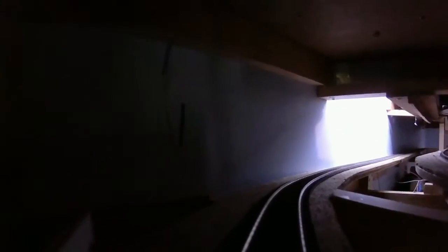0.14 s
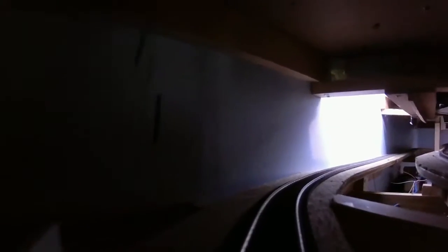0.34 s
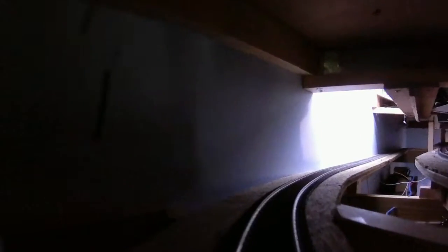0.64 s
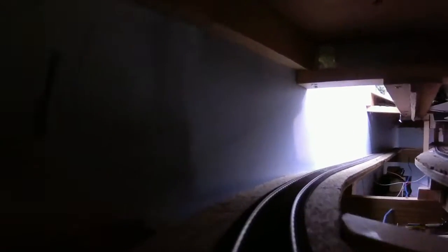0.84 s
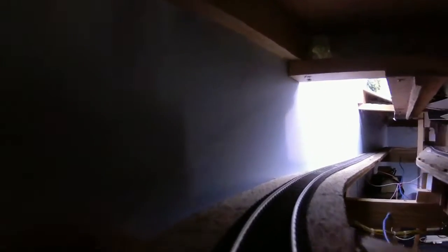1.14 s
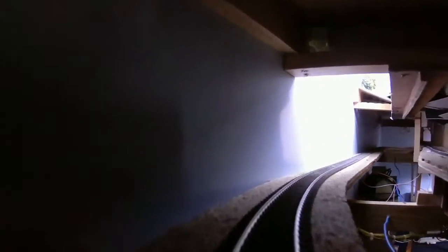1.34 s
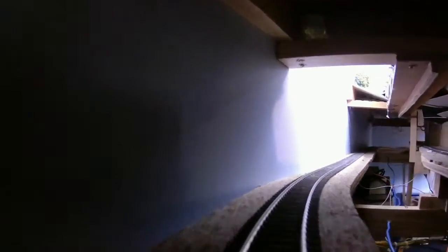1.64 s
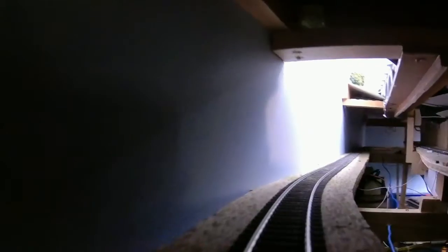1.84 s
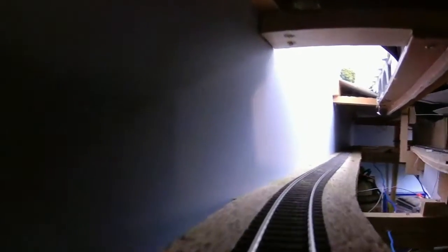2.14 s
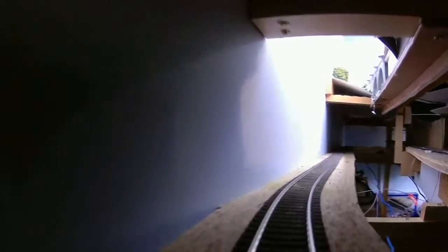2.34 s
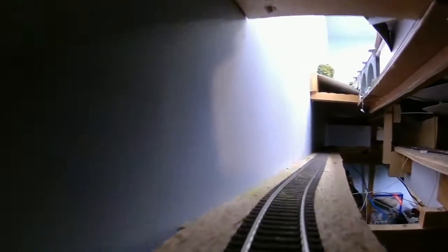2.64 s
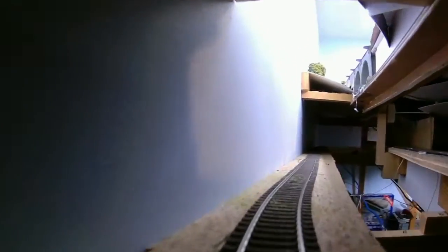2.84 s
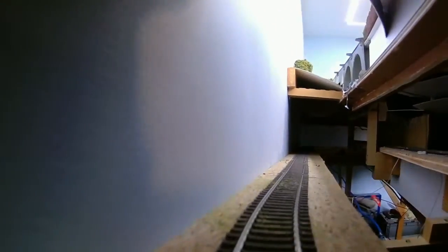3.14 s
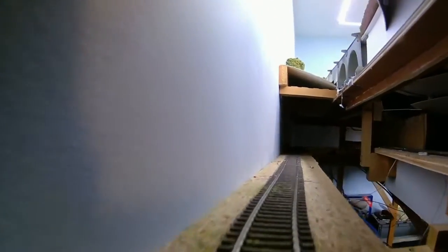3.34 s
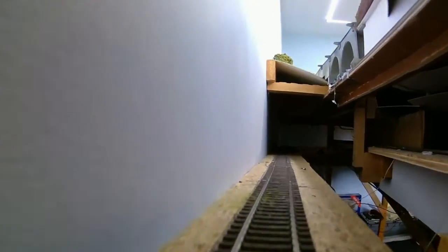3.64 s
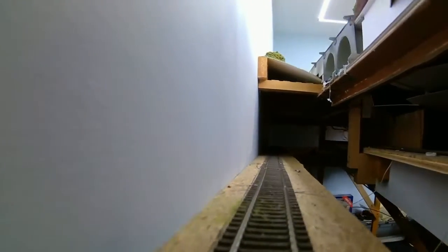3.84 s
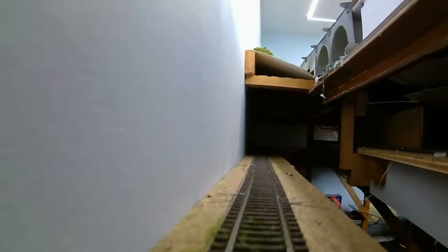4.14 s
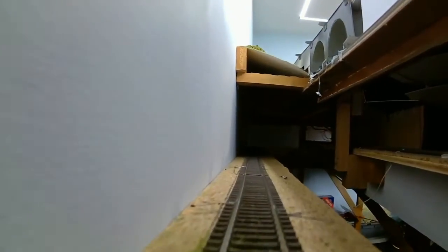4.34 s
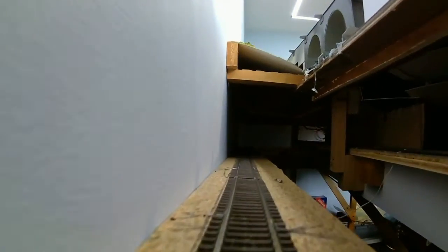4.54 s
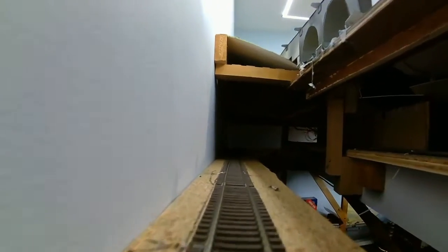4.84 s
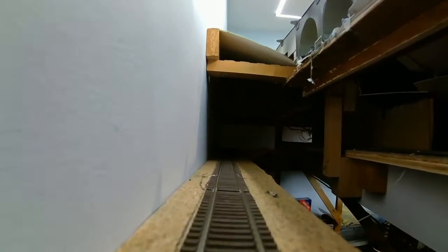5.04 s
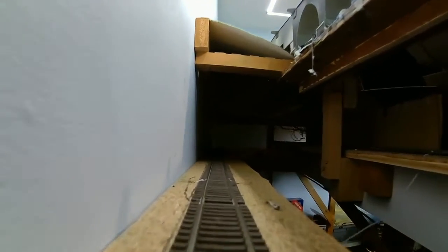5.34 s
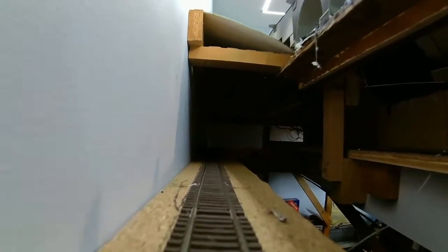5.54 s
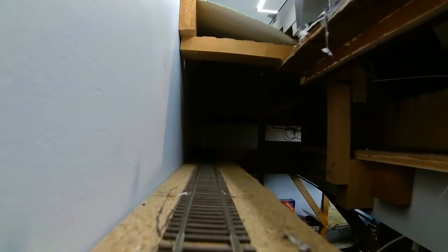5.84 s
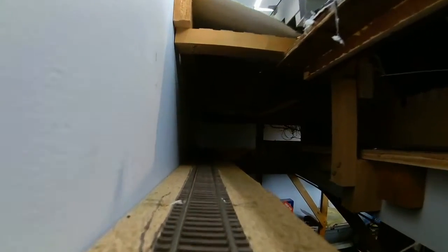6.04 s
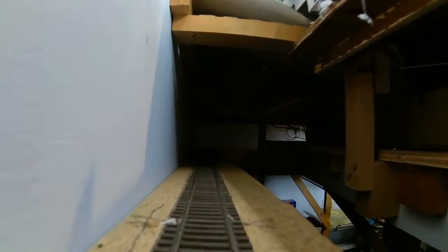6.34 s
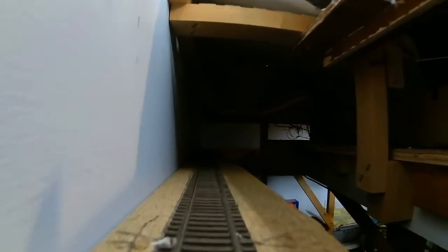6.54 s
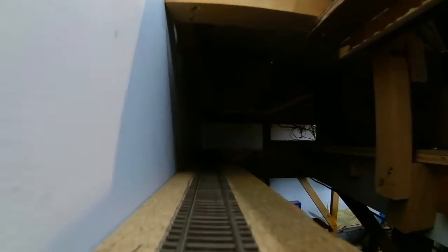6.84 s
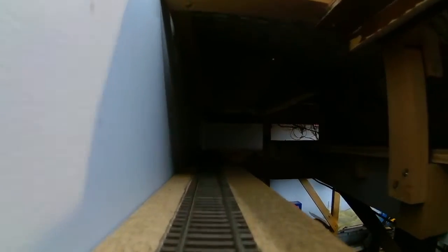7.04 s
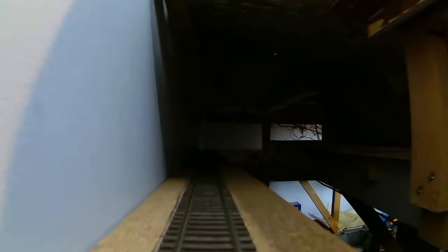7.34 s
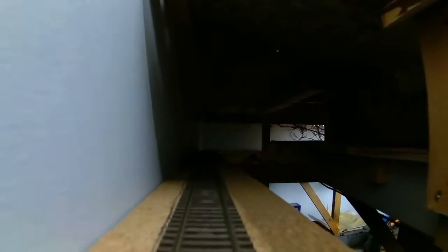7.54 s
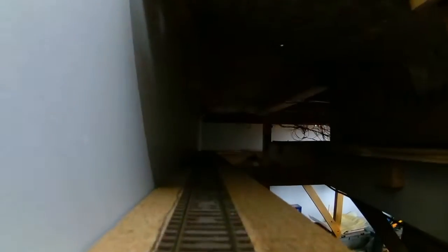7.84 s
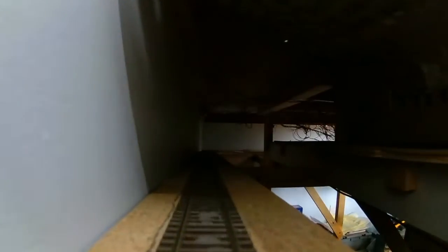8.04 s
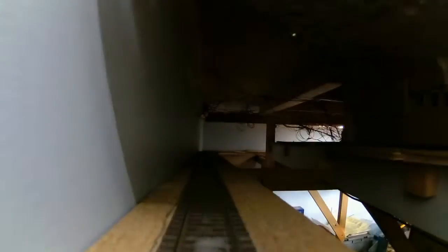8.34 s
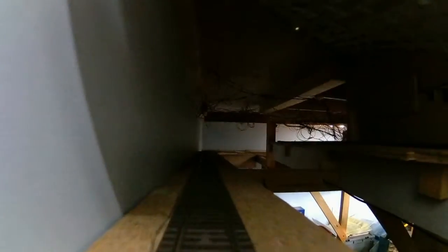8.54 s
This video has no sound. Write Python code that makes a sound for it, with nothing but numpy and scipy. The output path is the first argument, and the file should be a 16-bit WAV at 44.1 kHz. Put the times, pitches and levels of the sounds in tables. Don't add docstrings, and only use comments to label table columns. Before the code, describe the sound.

A model train rattles steadily along its track, rapid gear chatter and dull thumps over a gritty wheel roll, heard from on board.

```python
import sys
import numpy as np
from scipy import signal
from scipy.io import wavfile
from scipy.ndimage import uniform_filter1d, minimum_filter1d

SR = 44100
rng = np.random.default_rng(int(sys.argv[2]) if len(sys.argv) > 2 else 0)


def amplitude_ratio(level_db):
    exponent = np.asarray(level_db, float) / 20
    return 10 ** exponent


def store_pcm(level_fs):
    pcm = np.round(np.clip(level_fs, -1, 1) * 32767).astype(np.int16)
    wavfile.write(sys.argv[1], SR, np.atleast_2d(pcm).T)


N = 383669

# width_hz, soft_rattle_lift_db, roll_lift_db
BODY_SHAPE = [
    (238, 0.3, 5),
    (344, 2.5, 8.5),
    (230, -3, 7),
    (360, -8, 4.5),
]
# start_s, then pitch_hz of each
BODY_PITCH = [(0, 666, 913, 1380, 1800), (1.55, 592, 850, 1430, 1564), (2, 657, 900, 1280, 1740),
              (2.8, 650, 874, 1470, 1560), (3.1, 647, 990, 1410, 1750), (3.83, 590, 1040, 1333, 1514),
              (4.65, 622, 975, 1365, 1540), (5.01, 660, 860, 1385, 1657), (6.01, 730, 894, 1244, 1523),
              (6.55, 756, 1080, 1135, 1530), (7, 660, 900, 1292, 1570), (7.75, 654, 930, 1200, 1460),
              (8.7, 720, 890, 1316, 1690)]
# start_s, then level_db of each
BODY_LEVEL = [(0, -10.5, -3.5, -10.5, 1.5), (.39, -9.5, -5.5, -8, -6.5), (1.06, -4.5, -15.5, -10.5, -2),
              (1.6, -7, -7.5, -7.5, -6.5), (1.95, -15.5, -1.5, -5.5, -4.5), (2.64, -6.5, -8, -1.5, -4.5),
              (2.9, -5, -16, -3.5, -6), (3.83, -11, -8.5, -11.5, -2.5), (4.3, -10, -8.5, -2.5, -2),
              (5.01, -15.5, -6, -1.5, -4), (6.01, -9.5, -3.5, -1.5, -3.5), (6.45, -5, -14.5, -4.5, -3),
              (7, -19, -6, -6.5, -4.5), (7.75, -17, -5.5, -13.5, -1), (8.7, -8.5, -4.5, -7.5, -6.5)]
# pitch_hz, width_hz, level_db
FIXED_SHELL_RINGS = [(2400, 500, -14), (2800, 380, -9), (3560, 320, -7)]
# pitch_hz, width_hz, straight_level_db, bend_lift_db, flutter_db
LOOSE_SHELL_RINGS = [(3148, 410, -1, -1.4, 0.2), (4050, 335, -11.5, 6, 0), (1852, 210, -10, -1, 2)]
# pitch_hz, width_hz, level_db
SPAN_RINGS = [(722.7, 47, -11), (884.5, 57, -10.5)]
# pitch_ratio, t60_s, level_db
CHASSIS_PARTIALS = [
    (1, 0.094, 3.5),
    (.72, 0.022, -9.5),
    (.58, 0.037, -18.5),
]
# start_s, pitch_hz
THUMP_PITCH = [(0, 347), (1.5, 373.4), (3, 366.8), (4.5, 351.6), (5.6, 350), (6.2, 344), (7.5, 375),
               (8.7, 370)]
# start_s, peak_db, pitch_hz
TOOTH_SLAPS = [(1.563, 4, 1582), (1.785, -1, 870), (1.937, -1, 907), (2.366, -2, 1254), (2.58, -0.5, 1556),
               (2.723, -4.5, 1587), (2.788, 0, 1385), (2.93, 1.5, 1384), (3.276, -6, 1360),
               (3.35, -5.5, 1570), (4.178, 1, 1293), (4.241, -8, 1420), (4.305, -1, 1344),
               (4.377, -7, 1482), (4.513, 2.5, 1400), (4.587, 0, 1290), (4.788, 2.5, 1300),
               (4.929, -4, 1370), (4.996, 1.5, 1426), (5.065, 2, 1358), (5.205, -1, 1307), (5.271, 4, 1420),
               (5.341, 4.5, 1370), (5.409, -8, 1351), (5.539, 1.5, 1375), (5.587, 2.5, 1170),
               (5.726, -2.3, 880), (7.145, -5.5, 818), (7.391, -1, 846), (8.003, -4.5, 875)]
# start_s, gear_load_db, loose_clatter_db, chassis_slack_db
DRIVE = [(-0.012, -31, -21.5, -39.5), (0.641, -29, -23.5, -40), (1.268, -28.5, -20, -35),
         (1.87, -25, -17, -27.5), (2.443, -27.5, -16.5, -23.5), (3.006, -28, -18.5, -20.5),
         (3.561, -25, -17.5, -21.5), (4.109, -24, -17.5, -24), (4.657, -23.5, -15.5, -26.5),
         (5.206, -23.5, -14, -28), (5.76, -28, -18.5, -33.5), (6.317, -28, -19, -32.5),
         (6.842, -26.5, -17, -31), (7.336, -27, -18, -33), (7.825, -27.5, -18, -32.5),
         (8.303, -26.5, -20.5, -33), (8.768, -31, -20, -36)]
# hard_lift_db, bright_lift_db, soft_lift_db, thump_lift_db
AXLE_ROUND = [
    (0.51, -.8, -0.68, -3.5),
    (-0.75, -.6, 0.96, 2),
    (0.93, 1.8, 1, 0),
]
# hard_spread_db, bright_spread_db, soft_spread_db, thump_spread_db
UNEVEN_DB = (0.66, 2.2, 1.2, 1.1)
# middle_s, length_s, level_db
SCRAPES = [
    (7.832, .014, -38),
    (7.858, .012, -41),
    (8.141, .012, -40),
    (8.158, .012, -40),
    (8.183, .012, -42),
    (8.38, .014, -40),
]

TURNS_PER_ROW, UNEVEN_S = 8, 0.0012
SLIP_TURN = 101
SOFT_OVER_LOAD_DB, ROLL_DB, ROLL_FOLLOWS_LOAD = 4, -19.5, 0.6
SHELL_DRIFT = 0.012
BEND_EASES_S, BEND_ENDS_S = 3, 4.05
SPAN_FROM_S, SPAN_FULL_S = 5.54, 6.4
SCRAPE_HZ, SCRAPE_WIDTH_HZ = 5200, 1300


def evened(x):
    return x / np.sqrt(np.mean(x ** 2) + 1e-20)


def curves(rows):
    s, *columns = np.transpose(rows)
    return [np.interp(np.arange(N) / SR, s, column) for column in columns]


def ramp(from_s, to_s, start, end):
    return np.interp(np.arange(N) / SR, [from_s, to_s], [start, end])


def add(mix, s, sound):
    at = round(s * SR)
    sound = sound[max(-at, 0):]
    part = mix[max(at, 0):][:len(sound)]
    part += sound[:len(part)]


def wander(rate_hz):
    points_per_s = 40
    points = rng.standard_normal(int(N / SR * points_per_s) + 2)
    smooth = signal.lfilter([1], [1, -np.exp(-2 * np.pi * rate_hz / points_per_s)], points)
    return np.interp(np.arange(N) / SR * points_per_s, np.arange(len(points)), evened(smooth))


def chatter(size, per_s, spread_db):
    hit = rng.random(size) < per_s / SR
    side = rng.choice([-1., 1.], size)
    return hit * side * amplitude_ratio(spread_db * np.minimum(rng.exponential(1, size), 3.4))


def scattered(drive, spread_db):
    side = rng.choice([-1., 1.], N)
    return drive * side * amplitude_ratio(spread_db * (rng.standard_normal(N) - spread_db / 8.1))


def resonate(x, hz, width):
    turn = np.exp(2j * np.pi * np.cumsum(hz * np.ones(N)) / SR)
    r = np.exp(-np.pi * width / SR)
    low = signal.lfilter([(1 - r) ** 2], [1, -2 * r, r * r], x / turn + 1e-18)
    return (turn * low).real * np.sqrt(2 * (1 + r) ** 3 / ((1 - r) * (1 + r * r)))


def walls(x, t60, slide_s):
    slot = np.arange(100) * 22
    decay = amplitude_ratio(-60 * slot / SR / t60)
    hop, out = round(slide_s * SR), np.zeros(N)
    padded = np.pad(x, (hop, 2 * hop))
    fade = np.sin(np.pi * np.arange(2 * hop) / (2 * hop))
    for at in range(0, N + hop, hop):
        taps = np.zeros(2300)
        taps[40 + slot + rng.integers(0, 22, 100)] = rng.choice([-1., 1.], 100) * decay
        stretch = padded[at:at + 2 * hop] * fade
        add(out, (at - hop) / SR, signal.oaconvolve(stretch, taps / np.linalg.norm(taps)))
    return out


def scrapes():
    swell = np.zeros(N)
    for s, length, db in SCRAPES:
        add(swell, s - length / 2, amplitude_ratio(db) * np.hanning(round(length * SR)))
    return swell * evened(resonate(chatter(N, 3000, 3.0), SCRAPE_HZ, SCRAPE_WIDTH_HZ))


def wheel_roll():
    load_db = curves(DRIVE)[0]
    rolling_db = ROLL_DB + ROLL_FOLLOWS_LOAD * (load_db - load_db.mean())
    return amplitude_ratio(rolling_db - 12.5) * evened(chatter(N, 4000, 3.8))


def turns(luck):
    k = np.arange(len(luck))
    rows = np.arange(len(DRIVE))
    s, load_db, clatter_db, slack_db = [np.interp(k / TURNS_PER_ROW, rows, c) for c in np.transpose(DRIVE)]
    db = np.array([clatter_db, load_db, load_db + SOFT_OVER_LOAD_DB, slack_db]).T
    axle_place = (k - (k >= SLIP_TURN)) % len(AXLE_ROUND)
    db = db + np.array(AXLE_ROUND)[axle_place] + np.multiply(UNEVEN_DB, luck[:, 1:])
    return np.column_stack([s + UNEVEN_S * luck[:, 0], np.gradient(s), db])


def thumps(shaft):
    out, t = np.zeros(N), np.arange(4000) / SR
    pitch_hz = curves(THUMP_PITCH)[0]
    for s, period, *_, thump_db in shaft:
        tune, late, bounce = rng.random(3)
        hz = pitch_hz[round(abs(s) * SR)] * (1 + 0.056 * (tune - 0.5))
        ring = sum(amplitude_ratio(db - 60 * t / t60) * np.sin(2 * np.pi * ratio * hz * t)
                   for ratio, t60, db in CHASSIS_PARTIALS)
        knock = amplitude_ratio(thump_db + 2.5) * ring * (1 - np.exp(-t / 0.0007))
        add(out, s + 0.28 * period, knock)
        add(out, s + 0.43 * period + 0.0094 + 0.0068 * late, 0.14 * bounce * knock)
        add(out, s + 0.8 * period, 0.36 * knock)
    return out


def slaps():
    out, t = np.zeros(N), np.arange(1500) / SR
    for s, peak_db, hz in TOOTH_SLAPS:
        late, share, side = rng.random(3)
        side_hz = hz * (0.82 + 0.17 * side)
        ring = np.sin(2 * np.pi * hz * t) + 0.66 * np.sin(2 * np.pi * side_hz * t)
        ring = ring * amplitude_ratio(-60 * t / 0.05) * (1 - np.exp(-t / 0.0008))
        edge = amplitude_ratio(-20.0 - 60 * t / 0.00091) * rng.standard_normal(len(t))
        add(out, s + 0.001, amplitude_ratio(peak_db - 5) * (ring + edge))
        add(out, s + 0.00524 + 0.00475 * late, amplitude_ratio(peak_db - 18.5) * share * ring)
    return out


def backlash():
    lift = np.zeros(N)
    for s, *_ in TOOTH_SLAPS:
        add(lift, s - 0.012, np.hanning(800))
    return 1 - 0.5 * np.clip(lift, 0, 1)


def rattle(rise_s, fall_s, per_s, spread_db):
    t = np.arange(-1200, 1600) / SR
    swell = np.exp(-np.where(t < 0, t / rise_s, t / fall_s) ** 2)
    burst = swell * chatter(len(t), per_s, spread_db)
    return -t[0], burst * np.sqrt(1300 / np.sum(burst ** 2))


def gears(shaft):
    hard, bright, soft = np.zeros((3, N))
    for s, period, hard_db, bright_db, soft_db, _ in shaft:
        lead, burst = rattle(0.0084, 0.011, 3000, 3.74)
        add(hard, s - 0.004 - lead, amplitude_ratio(hard_db) * burst)
        add(bright, s - 0.004 - lead, amplitude_ratio(bright_db) * burst)
        lead, burst = rattle(0.01, 0.0078, 3500, 3.34)
        add(soft, s + 0.54 * period - lead, amplitude_ratio(soft_db) * burst)
    return np.array([hard, bright, soft]) * backlash()


def body(hard, soft, roll):
    out = np.zeros(N)
    for hz, share_db, (width, soft_db, roll_db) in zip(curves(BODY_PITCH), curves(BODY_LEVEL), BODY_SHAPE):
        drive = hard + amplitude_ratio(soft_db) * soft + amplitude_ratio(roll_db) * roll
        loose_hz = hz * (1 + 0.015 * wander(10))
        out += amplitude_ratio(share_db) * resonate(scattered(drive, 2.57), loose_hz, width)
    return out


def shell(bright, soft, roll):
    out = np.zeros(N)
    bend = ramp(BEND_EASES_S, BEND_ENDS_S, 1, 0)
    tick = bright + amplitude_ratio(-7.0) * soft + amplitude_ratio(-8.0) * roll
    rings = list(FIXED_SHELL_RINGS)
    for hz, width, db, bend_db, flutter_db in LOOSE_SHELL_RINGS:
        loose_hz = hz * (1 + SHELL_DRIFT * wander(1.3))
        rings.append((loose_hz, width, db + bend_db * bend + flutter_db * wander(0.7)))
    for hz, width, db in rings:
        out += amplitude_ratio(db) * resonate(scattered(tick, 2.5), hz, width)
    return out


def hollow_span(hard, soft, roll):
    out = np.zeros(N)
    drive = hard + soft + amplitude_ratio(4.5) * roll
    for hz, width, db in SPAN_RINGS:
        out += amplitude_ratio(db + 1.5 * wander(2.9)) * resonate(scattered(drive, 2.5), hz, width)
    return ramp(SPAN_FROM_S, SPAN_FULL_S, 0, 1) * out


def car(shaft):
    hard, bright, soft = gears(shaft)
    roll = wheel_roll()
    rumble = amplitude_ratio(-11.5) * resonate(roll, 269, 160)
    rings = body(hard, soft, roll) + shell(bright, soft, roll) + hollow_span(hard, soft, roll)
    return rings + rumble + slaps() + scrapes()


def scene():
    shaft = turns(rng.standard_normal((127, 5)))
    direct = car(shaft)
    echo = walls(direct, t60=0.045, slide_s=0.15)
    return (amplitude_ratio(-3.0) * direct + amplitude_ratio(-8.0) * echo + thumps(shaft))[None]


def band_limit(x):
    return signal.sosfilt(signal.butter(12, 8220, fs=SR, output="sos"), x)


def record(dry):
    bass_cut = signal.cheby2(8, 40, 178, "high", fs=SR, output="sos")
    heard = signal.sosfilt(bass_cut, dry)
    slope = signal.lfilter([1, -0.9], [1], heard)
    step = np.sqrt(abs(uniform_filter1d(slope ** 2, 120, axis=1)))
    heard = heard + (amplitude_ratio(-6.0) * step + amplitude_ratio(-69.5)) * rng.standard_normal(dry.shape)
    room_left = minimum_filter1d(0.93 / np.maximum(abs(heard), 0.93), 90, axis=1)
    heard = heard * uniform_filter1d(room_left, 45, axis=1)
    edge = signal.firwin(231, 7780, window=("kaiser", 9), fs=SR)
    return band_limit(signal.oaconvolve(heard, edge[None], "same"))


dry = scene()
out = record(dry)
store_pcm(out)
```